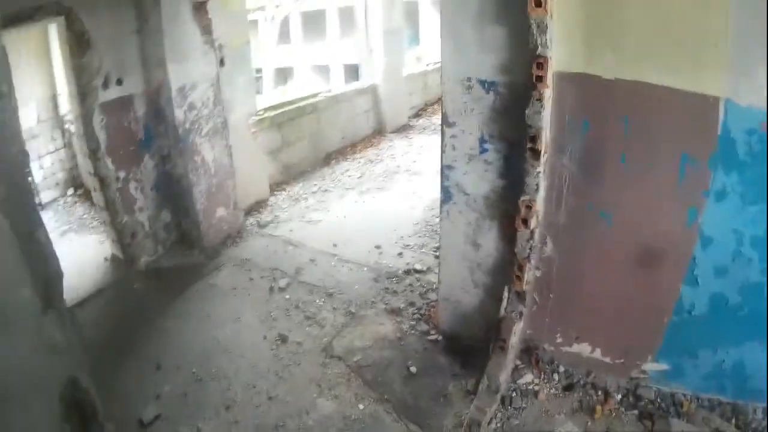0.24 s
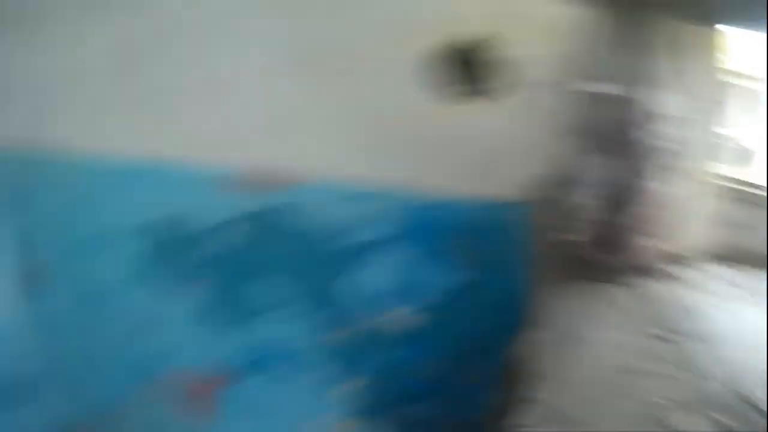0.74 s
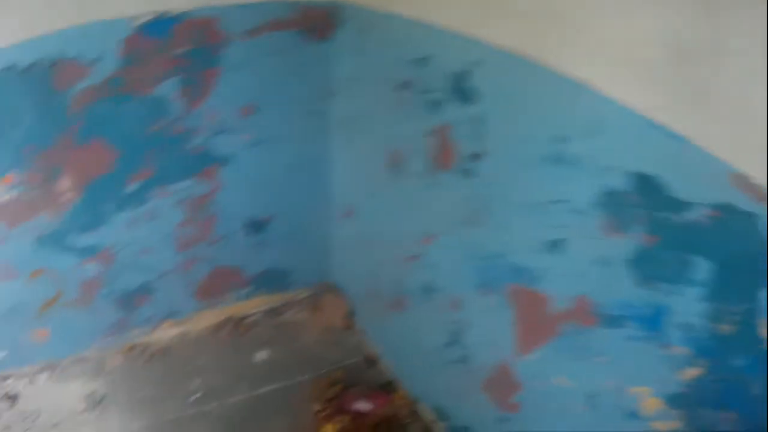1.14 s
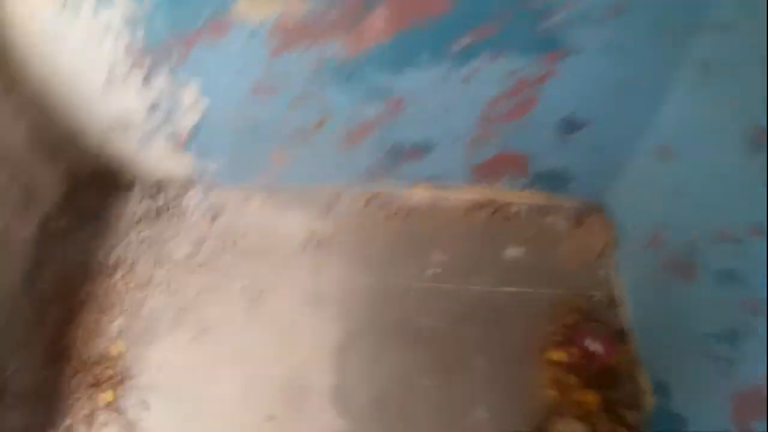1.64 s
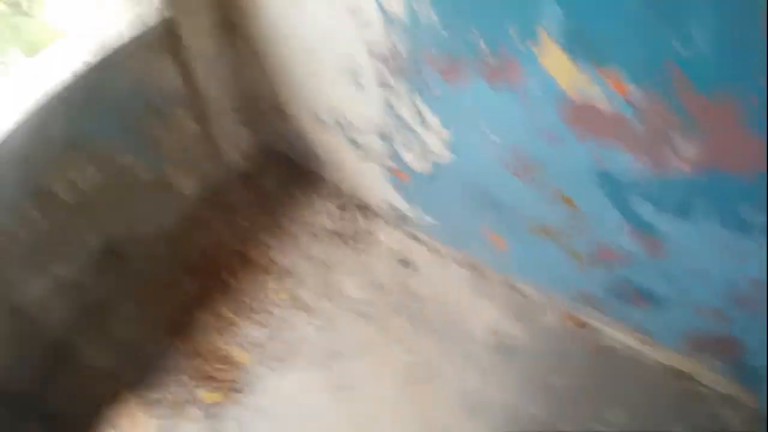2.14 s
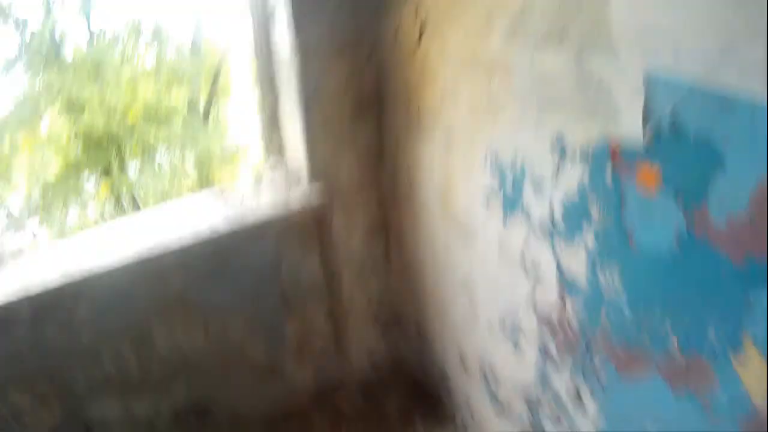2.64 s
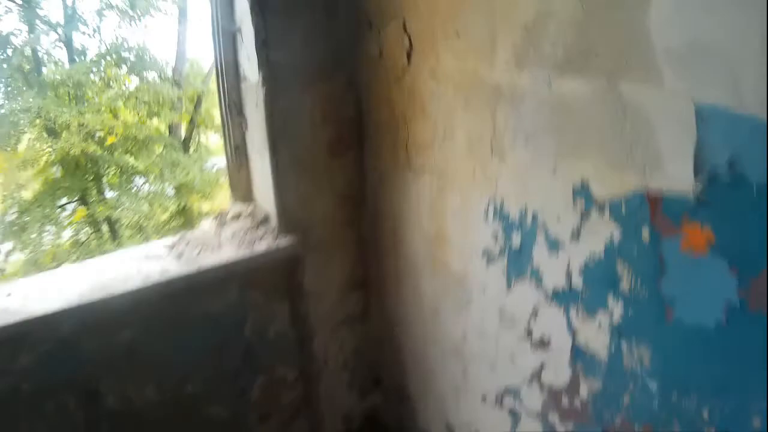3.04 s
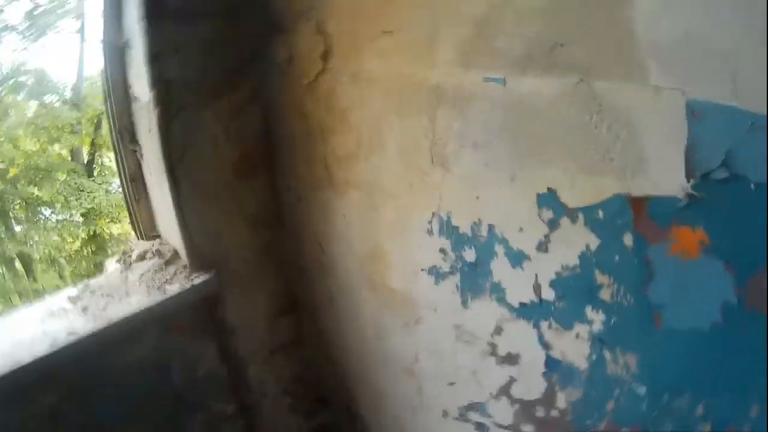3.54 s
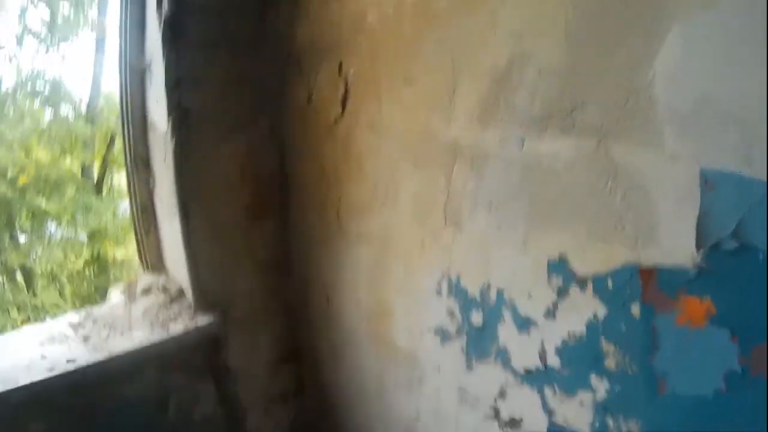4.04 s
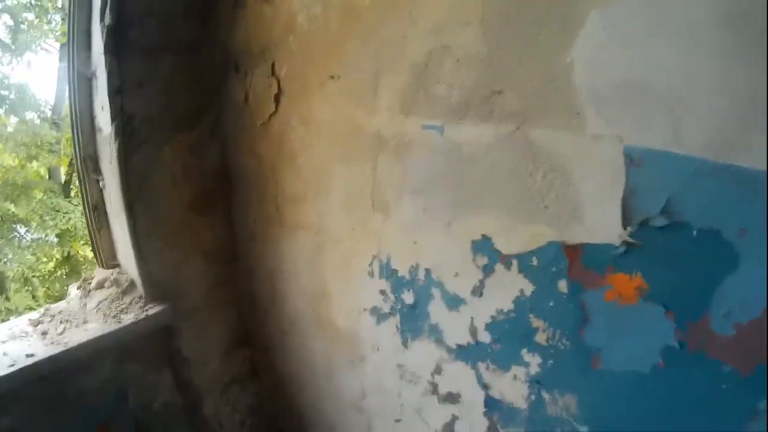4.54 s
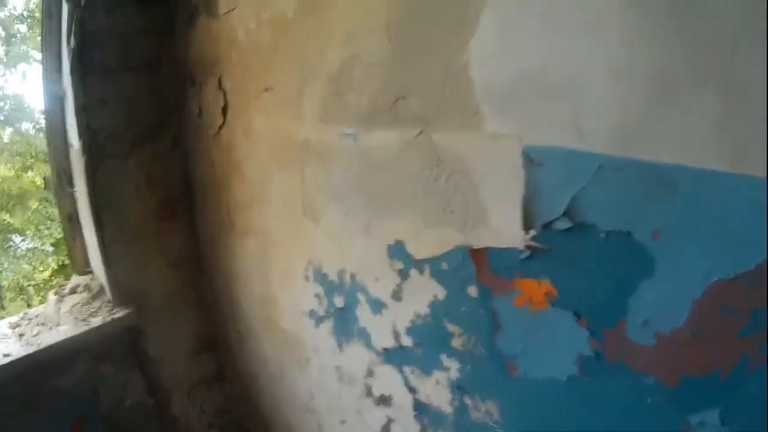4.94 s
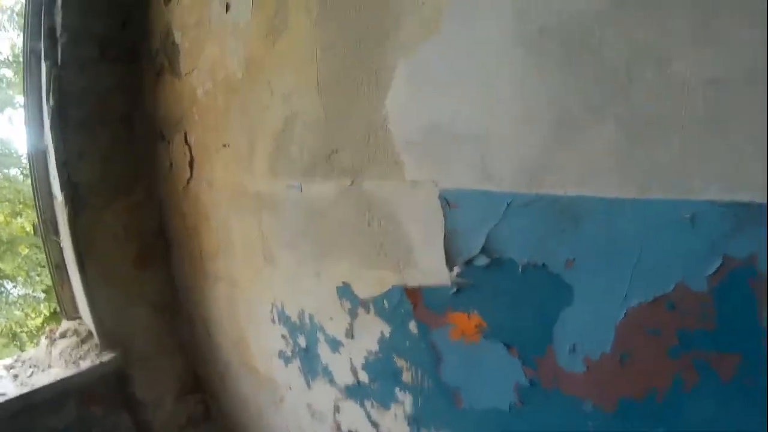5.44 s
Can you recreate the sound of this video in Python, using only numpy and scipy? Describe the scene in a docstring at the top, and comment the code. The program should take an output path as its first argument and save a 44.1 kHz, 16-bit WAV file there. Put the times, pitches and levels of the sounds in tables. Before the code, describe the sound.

For the first 1.35 seconds there is little but low, soft hiss, a very thin high electronic whine and a faint crunch of grit at 0.7. Then handling starts, extremely close and boxy: gear and grip rub a closed plastic case, with soft bumps around 1.5 and 1.8 and stronger thuds and strokes at 2.1 to 2.5, low rumble beneath. Small plastic clicks follow at 2.7 to 2.8. At 3.16 the mount clacks hard twice in quick succession, leaving a brief metallic ring. A heavy bump at 3.5 runs into the loudest, overloaded snap at 3.53. Rough strokes peak around 3.9, then lighter rubs lead to a bright, rasping scrape at 4.67 with a faint ring. Softer rubbing, bumps and a few clicks continue to about 5.7. Rubble crunches faintly underfoot throughout, mostly masked, with a slight bare-concrete echo.

```python
"""Handling a cased camera on plaster rubble

Someone steps over rubble in a bare concrete room; grit crunches faintly as slip grains under slow swells.
Gear and grip rub, bump and click on a closed plastic case: grains and impulses through its resonances.
The mount clacks and slides as a bank of modes, a metal fitting rings, electronics hiss and whine underneath."""
import sys
import numpy as np
from scipy import signal
from scipy.fft import rfft, irfft
from scipy.io import wavfile

SR = 44100
rng = np.random.default_rng(int(sys.argv[2]) if len(sys.argv) > 2 else 0)


def transcribe(signal):
    """Save signal, clipped to [-1, 1], as a 16-bit WAV file at the path in sys.argv[1]."""
    frames = np.atleast_2d(signal).T
    limited = np.clip(frames, -1, 1)
    pcm = np.round(limited * 32767).astype(np.int16)
    wavfile.write(sys.argv[1], SR, pcm)


N = 251370
TIME = np.arange(N) / SR
HZ = np.fft.rfftfreq(N, 1 / SR)
HANDLING_START_S = 1.35


def amp(db):
    """Decibels to gain."""
    return 10 ** (np.asarray(db) / 20)


def unit(x):
    """Scales to rms 1."""
    return x / np.sqrt(np.mean(x ** 2) + 1e-20)


def read(points, hz):
    """Interpolates (Hz, value) points on a log-frequency axis."""
    point_hz, value = np.transpose(points)
    return np.interp(np.log(hz + 1), np.log(point_hz), value)


def add(mix, start_s, sound):
    """Mixes a sound in at start_s."""
    part = mix[max(round(start_s * SR), 0):][:len(sound)]
    part += sound[:len(part)]


def shaped(x, gain):
    """Filters a full-length signal by a gain per frequency."""
    return irfft(rfft(x) * gain, N)


def below(edge_hz, order=4):
    """Gain of a low-pass."""
    return 1 / np.sqrt(1 + (HZ / edge_hz) ** (2 * order))


def softened(x, corner_hz, order=1):
    """Causal low-pass."""
    b, a = signal.butter(order, corner_hz, fs=SR)
    return signal.lfilter(b, a, x)


def wander(rate_hz):
    """Slow random motion of rms 1."""
    return unit(shaped(rng.standard_normal(N), below(rate_hz)))


def resonate(x, hz, width_hz):
    """A damped resonance that passes no steady push."""
    r = np.exp(-np.pi * width_hz / SR)
    return signal.lfilter([1, -1], [1, -2 * r * np.cos(2 * np.pi * hz / SR), r * r], x)


def grains(per_s, spread_db):
    """Tiny random slips of either sign, most near the smallest size, a few larger; rms 1."""
    size = amp(spread_db * np.minimum(rng.exponential(1, N), 4))
    sign = rng.choice([-1, 1], N)
    occurs = rng.random(N) < per_s / SR
    return unit(size * sign * occurs)


def electronics(hiss_db=-67, busy_hiss_db=2.5, idle_whine_db=-6):
    """Hiss and a thin beating whine, both a little stronger once the handling starts."""
    # hiss spectrum, relative: freq_hz, density_db (per Hz)
    hiss_points = [(35, -45.5), (60, 3), (242, -3.5), (320, -7.5), (359, -5.5), (423, -10), (486, -9.5),
                   (599, -11), (2200, -18.5), (9300, -22.5), (15500, -24)]
    # whine lines, level during handling: freq_hz, rms_db
    whine_lines = [(9491, -83.5), (9523, -83), (9561, -81)]
    busy = np.clip((TIME - HANDLING_START_S) / 0.044, 0, 1)
    hiss = unit(shaped(rng.standard_normal(N), amp(read(hiss_points, HZ))))
    whine = np.zeros(N)
    for hz, db in whine_lines:
        drifting_hz = hz + 3 * wander(rate_hz=18)
        whine += amp(db) * np.sqrt(2) * np.sin(2 * np.pi * np.cumsum(drifting_hz) / SR)
    return amp(hiss_db + busy_hiss_db * busy) * hiss + amp(idle_whine_db * (1 - busy)) * whine


def sway(contact, rest_db=-74, rumble_db=-45.5, typical_push_db=-45, give=0.62,
         stiff_above_db=-39, settle_s=0.025, rumble_hz=54, uneven_db=2):
    """Heavy contact flexes the case, which stiffens as it bends and pumps the air inside: a low rumble."""
    r = np.exp(-1 / (settle_s * SR))
    push = np.sqrt(signal.lfilter([1 - r], [1, -r], shaped(contact, below(150)) ** 2))
    bend = push / np.hypot(1, push / amp(stiff_above_db))
    noise = shaped(rng.standard_normal(N), below(rumble_hz) * (1 - below(4.5)))
    rumble = unit(noise * amp(uneven_db * wander(rate_hz=7)))
    level = amp(rest_db) + amp(rumble_db) * (bend / amp(typical_push_db)) ** give
    return level * rumble


def through_case(x, size=4096):
    """Rings a force through the plastic case: a minimum-phase filter with its resonances."""
    # broad response of the case: freq_hz, gain_db
    case_points = [(30, -17), (100, 12.5), (250, 2), (500, -2.5), (700, -6.5), (1100, -9.5), (1500, -6),
                   (2100, -15), (2600, -24.5), (3400, -30.5), (4600, -31), (5500, -36.5), (8000, -43.5),
                   (15000, -48)]
    # resonances of the case: freq_hz, width_hz, lift_db
    case_modes = [(423.8, 87, 8), (486, 130, 2.5), (820, 100, 9), (1112, 163, 11.5), (1300, 186, 11),
                  (1826, 65, 4.5), (1972, 270, 6.5), (2137, 110, 4), (2376, 120, 6), (2692, 120, 11),
                  (3110, 100, 13), (3814, 149, 13.5)]
    hz = abs(np.fft.fftfreq(size, 1 / SR))
    db = read(case_points, hz)
    for mode_hz, width_hz, lift_db in case_modes:
        db = db + lift_db / (1 + (2 * (hz - mode_hz) / width_hz) ** 2)
    spectrum = np.exp(np.conj(signal.hilbert(np.log(amp(db)))))  # phase that makes it causal
    response = np.fft.ifft(spectrum).real
    return signal.oaconvolve(x, response)[:len(x)]


def footsteps(grit_hz=4750, grit_width_hz=1300, sparkle_db=-15, sparkle_from_hz=6500):
    """Grit gives way under a sole: most is heard through the case, a fine sparkle slips in at its seam."""
    # crushed grit, level at the peak of the swell: start_s, level_db, swell_s (start to peak)
    step_table = [(.695, -64.5, 0.014), (1.53, -66.5, 0.073), (2.185, -52.5, 0.018), (2.44, -54.5, 0.02),
                  (3.578, -59, 0.011), (3.884, -51.5, 0.011), (3.944, -53.5, 0.013), (4.37, -64, 0.03),
                  (5.0, -61.5, 0.025), (5.16, -58, 0.0084), (5.41, -67.5, 0.043)]
    cracks = grains(per_s=1870, spread_db=4)
    grit = unit(through_case(resonate(cracks, grit_hz, grit_width_hz)))
    sparkle = unit(shaped(cracks, (1 - below(sparkle_from_hz)) * below(10200, order=2)))
    load = np.zeros(N)
    for start_s, level_db, swell_s in step_table:
        u = np.maximum(TIME - start_s, 0) / swell_s
        load += amp(level_db) * u * np.exp(1 - u)
    return load * (grit + amp(sparkle_db) * sparkle)


def room(x):
    """Diffuse echo of bare walls after 8 ms; the lows ring longest, the middle dies first."""
    # decay of the concrete room: freq_hz, t60_s
    decay_points = [(150, 0.79), (1200, 0.12), (3000, 0.34), (8000, 0.47)]
    hz, t, z = signal.stft(rng.standard_normal(SR), SR, nperseg=256)
    t60_s = read(decay_points, hz)[:, None]
    decay = np.exp(-np.log(1000) * t / t60_s) * (t > 0.008)
    tail = signal.istft(z * decay, SR)[1]
    return signal.fftconvolve(x, tail / np.linalg.norm(tail))[:N]


def swell(t, rise_s, fall_s, roundness):
    """Rises to 1 at t = 0 and dies away; roundness 1 is pointed, 2 a bell."""
    distance = np.maximum(-t / rise_s, t / fall_s)
    return np.exp(-np.minimum(distance ** roundness, 60))


def handling(grip_brightness_db=-0.5, grip_weight_db=-5.5, roundness=1.6):
    """Sums the power of strokes and resting grip; colour is their power-weighted mean."""
    # strokes of gear and grip over the case:
    # peak_s, level_db, rise_s, fall_s, brightness_db (per octave), weight_db (below 300 Hz, relative)
    rub_table = [(1.384, -50, 0.034, 0.026, -2, 10), (1.535, -45, 0.036, 0.038, 1.5, 2.5),
                 (1.635, -50, .012, 0.012, 3, 6.5), (1.688, -45.5, 0.024, 0.028, -4.5, 0.5),
                 (1.812, -48, 0.012, 0.019, -1, 2), (1.848, -49, .015, 0.038, -1.5, -14),
                 (1.945, -54.5, 0.03, .028, -2, 6.5), (2.045, -50.5, 0.086, 0.12, -1, -1),
                 (2.135, -38, 0.021, 0.031, -2, -3), (2.187, -36.5, 0.026, 0.038, 0.5, -2.5),
                 (2.315, -54, .012, 0.09, -6, 7.5), (2.42, -44, 0.033, .018, -3.5, -11),
                 (2.466, -34.5, 0.034, 0.049, 1, -11), (2.629, -42, 0.045, 0.025, 1, 2.5),
                 (2.844, -43.5, 0.034, 0.049, -0.5, -11.5), (2.915, -52.5, 0.038, 0.045, -12, -2),
                 (2.988, -38.5, 0.029, .028, -4.5, -10), (3.04, -44.5, 0.032, 0.036, -1, -19),
                 (3.077, -40.5, .016, .012, 2, -5.5), (3.217, -40, 0.047, 0.038, -4.5, -5.5),
                 (3.493, -29.5, 0.015, 0.018, -3, -3), (3.595, -38.5, 0.055, .028, 3, -18),
                 (3.725, -39.5, 0.021, 0.017, -4, -4), (3.82, -37.5, 0.0072, 0.0072, -4.5, -1),
                 (3.862, -30, .013, 0.018, -1, -11.5), (3.907, -25, 0.01, 0.026, -3.5, -16),
                 (4.035, -49, 0.0077, 0.0076, .5, 0), (4.175, -43.5, 0.052, 0.046, -2, -6),
                 (4.306, -46, 0.0071, 0.022, -2.5, -14), (4.361, -34.5, 0.013, 0.039, -4, -3.5),
                 (4.413, -38.5, 0.029, .014, -4, -10), (4.6, -46, 0.048, 0.064, -6.5, -7),
                 (4.66, -31, 0.027, 0.023, -2, -5), (4.699, -27, 0.044, 0.017, 1, -18.5),
                 (4.929, -47, 0.024, 0.025, -2.5, -1), (5.029, -38.5, 0.049, 0.038, -3, -6.5),
                 (5.144, -41.5, 0.014, 0.039, -4.5, -11), (5.196, -44.5, 0.011, 0.0088, 1.5, -14),
                 (5.4, -40, 0.024, 0.037, -5.5, -4.5), (5.437, -36.5, 0.018, 0.041, -4.5, -5),
                 (5.519, -42, 0.018, 0.013, -5, 1.5), (5.683, -44, 0.012, 0.021, -6.5, 1.5)]
    # light rustle of the grip between strokes: time_s, level_db
    grip_points = [(1.35, -64.5), (1.76, -58), (2.35, -55), (2.72, -58), (3.05, -51.5), (3.31, -66),
                   (3.42, -53), (3.64, -53), (4.1, -57), (4.48, -67), (4.76, -55), (4.84, -66),
                   (5.08, -49.5), (5.24, -65), (5.7, -64)]
    power = amp(np.interp(TIME, *np.transpose(grip_points))) ** 2
    bright, heavy = grip_brightness_db * power, grip_weight_db * power
    for peak_s, level_db, rise_s, fall_s, brightness_db, weight_db in rub_table:
        stroke = (amp(level_db) * swell(TIME - peak_s, rise_s, fall_s, roundness)) ** 2
        power = power + stroke
        bright = bright + brightness_db * stroke
        heavy = heavy + weight_db * stroke
    onset = np.clip((TIME - HANDLING_START_S) / 0.0037, 0, 1)
    return np.sqrt(power) * onset, bright / power, heavy / power


def rubbing(pivot_hz=900, thin_below_hz=105, crackle_db=-5.5, patchy_db=2.5, catch_db=2.0, gliding_db=-37):
    """Stick-slip grains drive the case; weak contact catches and snags, strong contact glides."""
    level, brightness_db, weight_db = handling()
    sticky = 1 / np.hypot(1, level / amp(gliding_db))
    level = level * amp(catch_db * sticky * wander(rate_hz=64))
    fine_slips = grains(per_s=5000, spread_db=2.5)
    coarse_snags = grains(per_s=85, spread_db=0.5)
    sound = through_case(fine_slips + amp(crackle_db) * sticky * coarse_snags)
    low = below(300)
    weight = unit(shaped(sound, low * (1 - below(thin_below_hz, order=2))))
    rasp = unit(shaped(sound, 1 - low))
    octaves = np.arange(-1, 3)
    place = np.log2((HZ + 1) / pivot_hz)
    tilted = np.zeros(N)
    for k in octaves:  # the moving contact point favours one part of the shell, then another
        band = shaped(rasp, np.interp(place, octaves, octaves == k))
        tilted += amp(brightness_db * k + patchy_db * wander(rate_hz=14)) * band
    return level * (tilted + amp(weight_db) * weight)


def bumps(size=4096, chatter=0.033, chatter_s=0.0055, push_db=-11, push_hz=95, push_width_hz=80):
    """A soft blow chatters briefly and pushes the whole case; the softer the contact, the lower the pitch."""
    # soft bumps, peak before the push is added: start_s, peak_db, pitch_hz
    bump_table = [(1.368, -33, 93), (1.387, -37, 120), (1.514, -21.5, 392), (1.545, -22.5, 560),
                  (1.685, -30, 404), (1.807, -22.5, 242), (1.845, -30.5, 393), (2.119, -19, 236),
                  (2.129, -22, 670), (2.309, -33.5, 300), (2.423, -27.5, 455), (2.598, -38, 515),
                  (2.612, -27, 187), (2.65, -32, 380), (2.832, -31.5, 258), (3.163, -28, 400),
                  (3.4879, -20.5, 277), (3.4972, -10.5, 269), (3.702, -35, 494), (3.854, -20.5, 327),
                  (4.353, -31.5, 433), (5.392, -34.5, 600), (5.427, -34, 413)]
    out, t = np.zeros(N), np.arange(size) / SR
    push = resonate(1 - np.exp(-t / 0.0015), push_hz, push_width_hz)
    push = amp(push_db) * push / abs(push).max()
    for start_s, peak_db, pitch_hz in bump_table:
        force = chatter * rng.standard_normal(size) * np.exp(-t / chatter_s)
        force[0] += 1
        padded = softened(force, 1.3 * pitch_hz)
        blow = through_case(resonate(padded, pitch_hz, width_hz=0.44 * pitch_hz))
        add(out, start_s, amp(peak_db) * (blow / abs(blow).max() + push))
    return out


def clicks(size=4096):
    """Hard parts snap against the case and ring for a few cycles: an impulse through two resonances. The one at
    5.434 s is a squeak of the rubbing."""
    # hard plastic clicks, and a rubbing squeak at 5.434 s: start_s, peak_db, pitch_hz, width_hz (of the first
    # resonance)
    click_table = [(1.988, -38, 1900, 2000), (2.375, -42, 1710, 1000), (2.535, -36, 1700, 1190),
                   (2.704, -32.5, 1730, 600), (2.733, -31, 1510, 610), (2.824, -25.5, 1250, 1620),
                   (2.833, -29, 750, 1300), (2.978, -37, 800, 1580), (3.134, -33.5, 1300, 1490),
                   (3.1631, -15.5, 1300, 2200), (3.276, -38.5, 1390, 1000), (3.5312, 1, 1300, 1660),
                   (3.5353, -22.5, 950, 895), (3.581, -23.5, 1400, 300), (4.302, -34, 1200, 1365),
                   (4.754, -35, 1194, 1600), (5.434, -29, 1130, 350), (5.547, -31.5, 1100, 687)]
    out = np.zeros(N)
    for start_s, peak_db, pitch_hz, width_hz in click_table:
        snap = resonate(signal.unit_impulse(size), pitch_hz, width_hz)
        sound = through_case(resonate(snap, pitch_hz, 0.88 * width_hz))
        add(out, start_s, amp(peak_db) * sound / abs(sound).max())
    return out


def through_mount(x, corner_hz):
    """Rings the stiff mount; a softer contact reaches fewer of its high modes."""
    # modes of the mount: freq_hz, width_hz, gain_db
    mount_modes = [(300, 400, -12), (493, 43, 2), (586, 74, -2), (802, 121, 4.5), (1162, 207, 4),
                   (1240, 24, -6), (1766, 233, -4), (1808, 114, 8.5), (2127, 97, 8), (2260, 100, -24),
                   (2494, 98, -6), (3280, 230, -17.5), (3694, 97, 1), (4000, 340, -17), (5520, 210, -22.5)]
    force = softened(x, corner_hz)
    out = np.zeros(len(x))
    for k, (hz, width_hz, gain_db) in enumerate(mount_modes):  # alternating polarity
        out += (-1) ** k * amp(gain_db) * width_hz * resonate(force, hz, width_hz)
    return out


def muffled(x, edge_hz=4900):
    """The closed shell keeps out much of the top treble."""
    return softened(x, edge_hz, order=2)


def scrapes(slips_per_s=7000, roundness=3.0):
    """The mount slides in its joint: slip grains swell and die within a few hundredths of a second."""
    # slides: peak_s, level_db, rise_s, fall_s, contact_corner_hz
    scrape_table = [(3.147, -30.5, 0.0052, 0.022, 5990), (3.585, -33, 0.0021, 0.0098, 1000),
                    (3.907, -36.5, 0.013, 0.0079, 600), (4.668, -18.5, 0.014, 0.011, 9300),
                    (4.697, -43, 0.0048, 0.014, 1500)]
    out, slips = np.zeros(N), grains(per_s=slips_per_s, spread_db=3.5)
    t = np.arange(-SR // 10, SR // 10) / SR
    for peak_s, level_db, rise_s, fall_s, corner_hz in scrape_table:
        stroke = swell(t, rise_s, fall_s, roundness)
        sound = muffled(through_mount(stroke * rng.choice(slips, len(t)), corner_hz))
        sound *= np.linalg.norm(stroke) / np.linalg.norm(sound)
        add(out, peak_s + t[0], amp(level_db) * sound)
    return out


def clacks(size=4096):
    """The mount strikes its stop and bounces once."""
    # knocks, peak before overload: start_s, peak_db, contact_corner_hz
    clack_table = [(3.1628, -2, 600), (3.1659, -3, 2620)]
    out = np.zeros(N)
    for start_s, peak_db, corner_hz in clack_table:
        sound = muffled(through_mount(signal.unit_impulse(size), corner_hz))
        add(out, start_s, amp(peak_db) * sound / abs(sound).max())
    return out


def fitting():
    """A small metal part rings on after the hardest contacts: decaying sines."""
    # ringing partials: start_s, peak_db, freq_hz, t60_s
    ring_table = [(3.165, -27, 1876, .13), (3.165, -43.5, 4245, .115), (3.165, -62, 2210, .88),
                  (4.67, -46, 2191, .49), (4.669, -50, 1357, .5)]
    out, t = np.zeros(N), np.arange(SR) / SR
    for start_s, peak_db, hz, t60_s in ring_table:
        decay = np.exp(-np.log(1000) * t / t60_s)
        add(out, start_s, amp(peak_db) * decay * np.sin(2 * np.pi * hz * t))
    return out


def scene():
    """Contact sounds carry a trace of the room, the steps carry more of it."""
    contact = rubbing() + bumps() + clicks() + scrapes() + clacks() + fitting()
    steps = footsteps()
    echo = room(amp(-26.5) * contact + amp(-5) * steps)
    return (electronics() + sway(contact) + steps + contact + echo)[None]


def record(dry, overload=0.69, cutoff_hz=15800):
    """The loudest peaks overload the input; then the band limit."""
    clipped = np.clip(dry, -overload, overload)
    band_limit = signal.firwin(401, cutoff_hz, window=("kaiser", 8), fs=SR)
    return signal.oaconvolve(clipped, band_limit[None], "same")


dry = scene()
out = record(dry)
transcribe(out)
```